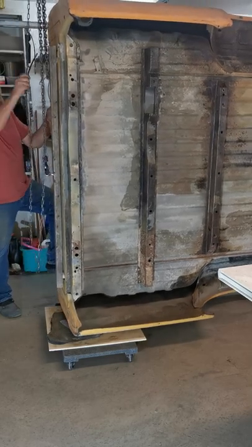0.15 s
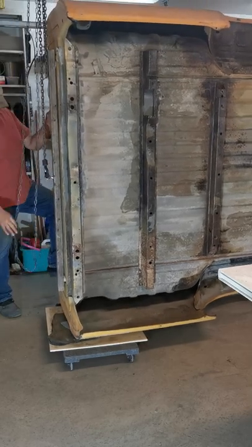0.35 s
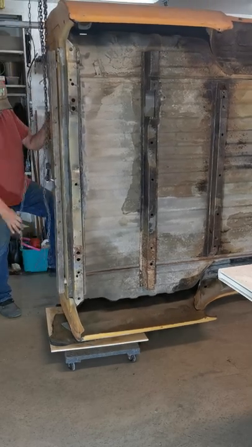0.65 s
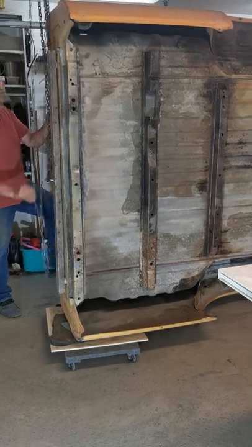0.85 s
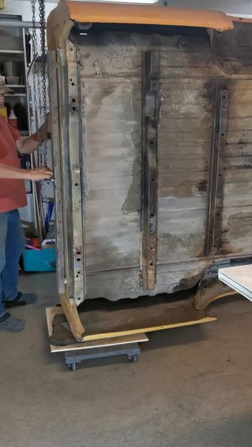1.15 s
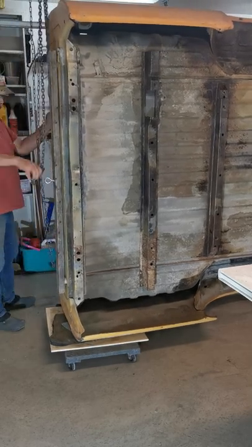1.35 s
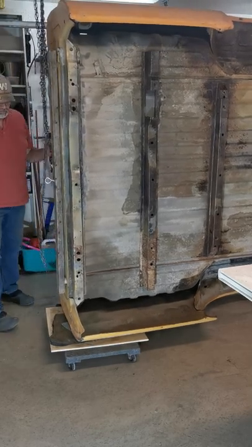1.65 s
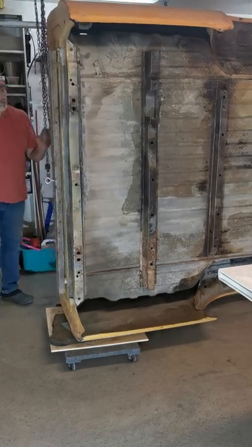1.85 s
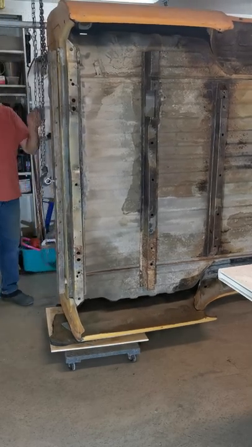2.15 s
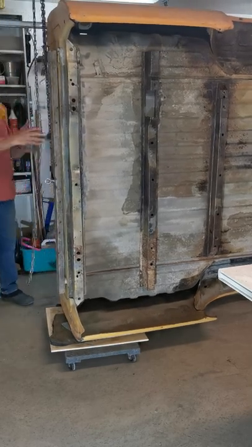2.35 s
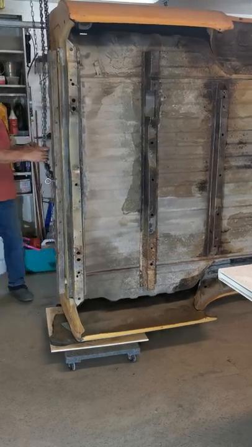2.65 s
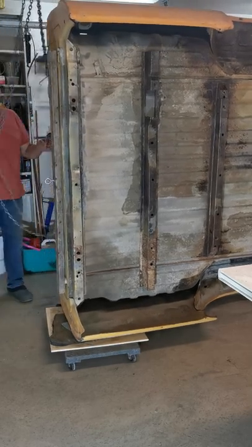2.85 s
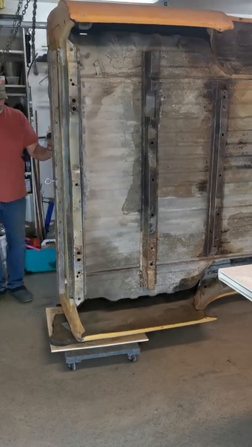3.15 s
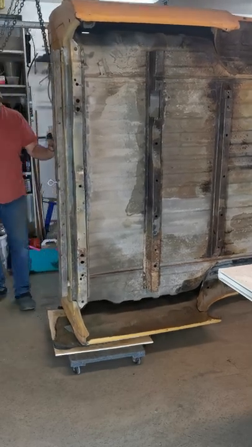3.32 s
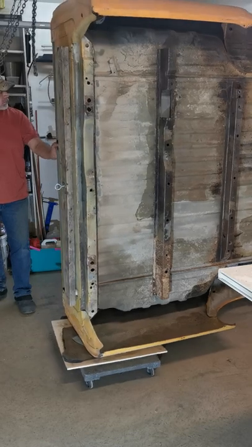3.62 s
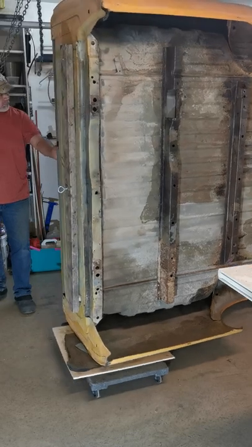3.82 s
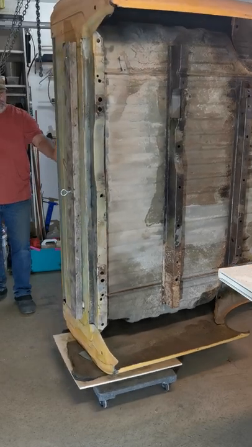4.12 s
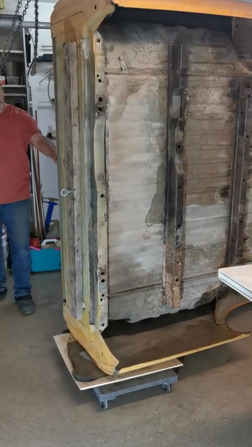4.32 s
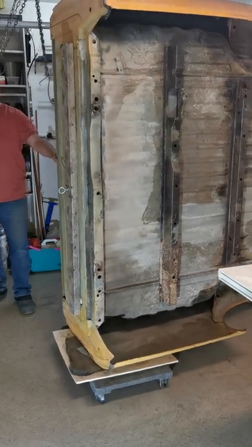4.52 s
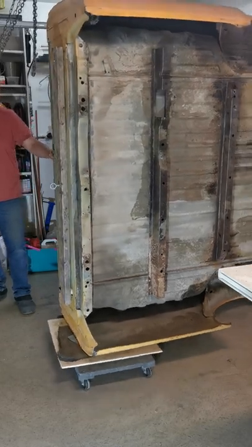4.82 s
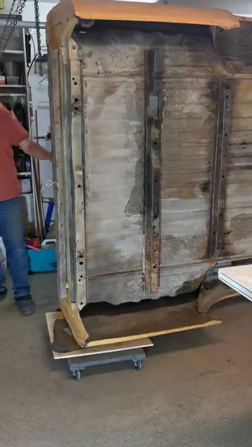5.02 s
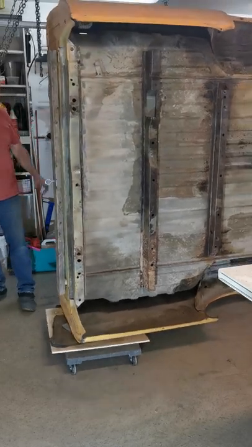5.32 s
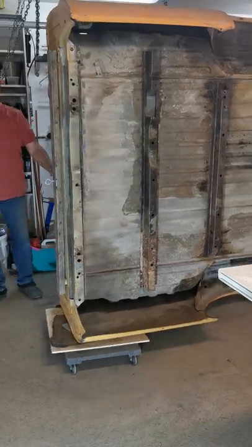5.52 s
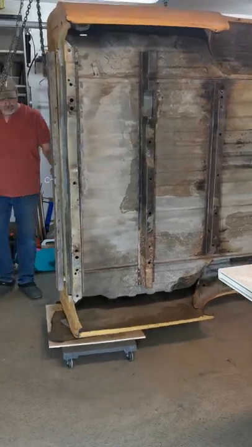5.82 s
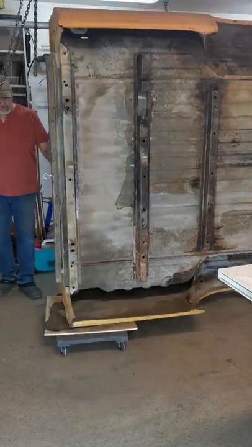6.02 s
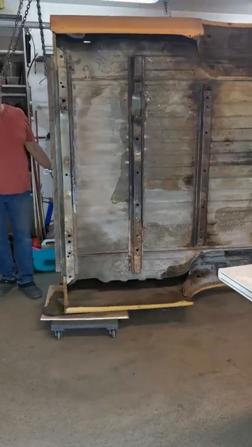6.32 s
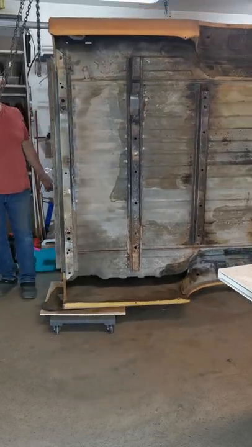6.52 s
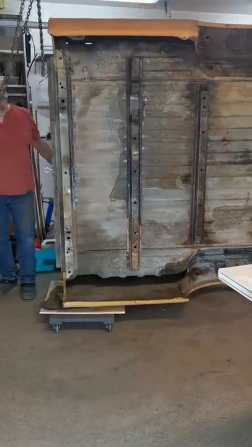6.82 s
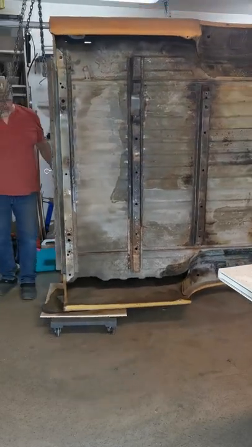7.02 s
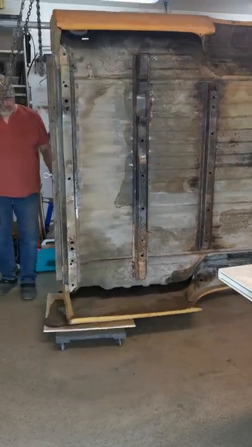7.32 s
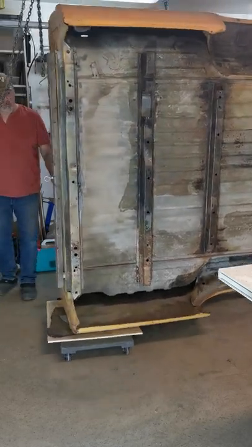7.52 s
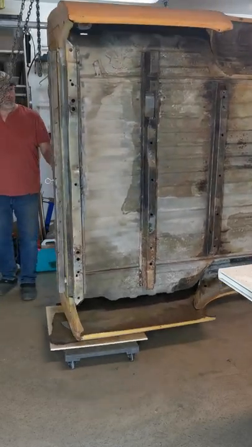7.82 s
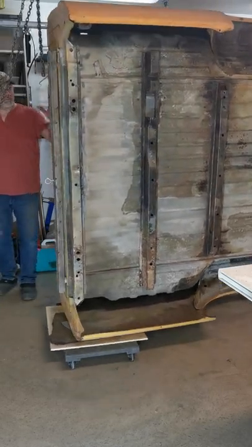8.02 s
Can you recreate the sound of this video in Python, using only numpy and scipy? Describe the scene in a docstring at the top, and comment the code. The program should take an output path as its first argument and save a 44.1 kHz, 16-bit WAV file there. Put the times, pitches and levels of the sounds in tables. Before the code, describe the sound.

Rapid, unnaturally fast chain clatter opens, with bright ticks and short housing rattles. It suddenly drops to normal speed: a hard metal strike makes a large steel panel ring, then chain links scrape and hooks knock with short room echoes. Hollow booming and rolling rumble come and go, quieter midway, swelling strongly at the end. Quiet garage room tone; chain close, slightly to the right.

```python
"""A hand chain runs through a hoist in a garage; the first 1.46 s sound sped up, faster and higher, and from then
on the pace is normal. The chain is noise gated by small contacts. Knocks of links and hooks come throughout: each
is a snap of noise that spreads into the echo of the room. Single rings are wavering tones, ticks tiny noise bursts.
From 1.46 s a large steel truck bed swings on a wheeled dolly: small jolts make its resonances boom and rumble.
Room noise lies under it all, joined by a faint hum from 1.46 s on."""
import sys
import numpy as np
from scipy import signal
from scipy.fft import rfft, irfft, next_fast_len
from scipy.io import wavfile
from scipy.ndimage import uniform_filter1d, map_coordinates

SR = 44100
rng = np.random.default_rng(int(sys.argv[2]) if len(sys.argv) > 2 else 0)


def to_wav(s):
    """Save 16-bit WAV."""
    ch = np.atleast_2d(s).T  # columns
    pcm = np.round(np.clip(ch, -1, 1) * 32767)  # PCM
    wavfile.write(sys.argv[1], SR, pcm.astype(np.int16))


N = 360341
NORMAL_S = 1.46  # until then all sounds sped up, faster and higher; from then on at normal pace, with the bed
STEP = 32  # samples between envelope values

# Rings of the chain links in the sped-up part. Each row: frequency in Hz, width in Hz, strength in dB.
LINK_RINGS = [(4780, 170, -2), (6030, 140, -26), (6500, 370, 1), (8200, 120, 3.5), (9230, 1100, 5.5),
              (10800, 380, 7), (12300, 160, -8), (12940, 400, 12), (15200, 280, 0.5)]


def amp(db):
    """Gain of a level in dB."""
    return 10 ** (np.asarray(db) / 20)


def unit(x):
    """Scale x to an rms of 1."""
    return x / np.sqrt(np.mean(x ** 2) + 1e-20)


def along(points, hz):
    """Read a curve of (Hz, value) points on a log frequency axis."""
    point_hz, value = np.transpose(points)
    return np.interp(np.log(hz + 1), np.log(point_hz + 1), value)


def curves(rows):
    """One value per sample for each column after the time."""
    s, *columns = np.transpose(rows)
    return [np.interp(np.arange(N) / SR, s, column) for column in columns]


def modes(table, f):
    """Response of a set of resonances, added with alternating signs."""
    total = 0
    for k, (hz, width_hz, db) in enumerate(table):
        damping = 1j * f * width_hz
        total = total + (-1) ** k * amp(db) * damping / (hz * hz - f * f + damping)
    return total


def filtered(x, response):
    """Multiply the spectrum of x by a complex response of frequency."""
    n = x.shape[-1]
    size = next_fast_len(n + 8192)
    return irfft(rfft(x, size) * response(np.fft.rfftfreq(size, 1 / SR)), size)[..., :n]


def contacts(n, rate, spread_db, life, steady):
    """Two unrelated noises gated by the same random contacts (rate per s, life in s), over a steady share."""
    hits = (rng.random(n) < rate / SR) * amp(spread_db * rng.standard_normal(n))
    gate = signal.lfilter([1], [1, -np.exp(-1 / (life * SR))], hits)
    return unit((steady + unit(gate)) * rng.standard_normal((2, n)))


def ringing(x, table, drift_db, rate):
    """x through each resonance, whose strength drifts on its own as other parts are struck."""
    n = x.shape[-1]
    size = next_fast_len(n + 8192)
    spectrum, f = rfft(x, size), np.fft.rfftfreq(size, 1 / SR)
    drifts = rng.uniform(-1, 1, (len(table), int(n * rate / SR) + 2))
    total = 0
    for knots, mode in zip(drifts, table):
        drift = np.interp(np.arange(n) * rate / SR, np.arange(len(knots)), knots)
        total = total + amp(drift_db * drift) * irfft(spectrum * modes([mode], f), size)[:, :n]
    return unit(total)


def clinks(n, table):
    """Single parts clink at random, each near one of the given rings and a little off pitch."""
    rate, t60, spread_db = 260, 0.03, 2  # per s, s to fall 60 dB, dB
    detune_share = 0.095  # of the pitch
    count, t = round(rate * n / SR), np.arange(SR // 16) / SR
    when, which, phase = rng.random((3, count, 1))
    detune, size = rng.standard_normal((2, count, 1))
    chosen = np.array(table)[(which * len(table)).astype(int)]
    hz, _, db = np.transpose(chosen, (2, 0, 1))
    arc = 2 * np.pi * hz * (1 + detune_share * detune) * t
    # strong and weak rings are brought closer together in level
    fade = amp(0.4 * db + spread_db * size - 60 * t / t60) * (1 - np.exp(-t / 0.0031))
    at = ((when * n).astype(int) + np.arange(len(t))).ravel()
    pair = []
    for p in (0, phase):  # same clinks in both channels, with unrelated phases
        tones = fade * np.sin(arc + 2 * np.pi * p)
        pair.append(np.bincount(at, tones.ravel(), n)[:n])
    return unit(np.array(pair))


def spread(pair):
    """Turn a pair of signals into left and right: the bass is alike on both, the treble mostly unrelated."""
    # Each row: frequency in Hz, level of the unshared part against the shared part in dB.
    side_db = [(30, -18), (70, -27), (140, -22), (280, -18.5), (600, -10.5), (1500, -5), (10000, -0.5)]

    def shares(f):
        turn = np.arctan(amp(along(side_db, f)))
        return np.array([np.cos(turn), np.sin(turn)])

    mid, side = filtered(pair, shares)
    return np.array([mid + side, mid - side])


def stroke(s, rise, held, db, fall, sag=0):
    """Power of one stroke: it swells, holds while it sags, then falls (fall and sag in dB per s)."""
    t = np.arange(0, N + STEP, STEP) / SR - s
    swell = np.sin(np.pi / 2 * np.clip(t / rise, 0, 1)) ** 2
    level_db = db - sag * np.maximum(t, 0) - fall * np.maximum(t - rise - held, 0)
    return (swell * amp(level_db)) ** 2


def gain(strokes):
    """Gain per sample of overlapping strokes, whose powers add."""
    power = sum(strokes)
    return np.interp(np.arange(N) / STEP, np.arange(len(power)), np.sqrt(power))


def room():
    """Steady coloured noise of the room; from 1.46 s on it is duller and a thin hum wavers in it."""
    # Colours of the room noise, early and late. Each row: frequency in Hz, level in dB.
    early_colour = [(15, -40), (25, -8), (60, -26), (177, -3.5), (600, -7), (854, -4), (1510, -0.5),
                    (2090, -10.5), (2330, -12), (5570, -19.5), (14400, -24), (16500, -46)]
    late_colour = [(15, -38.5), (25, -16), (208, -8), (296, -3), (349, -12), (410, -11), (524, -35),
                   (902, -26), (3410, -37), (14000, -42), (16500, -48)]
    noise = rng.standard_normal((3, 2, N))
    early = amp(-51.5) * unit(filtered(noise[0], lambda f: amp(along(early_colour, f))))
    late = amp(-54) * unit(filtered(noise[1], lambda f: amp(along(late_colour, f))))
    # noise through one narrow resonance: 850 Hz, 6 Hz wide
    hum = amp(-73) * unit(filtered(noise[2], lambda f: modes([(850, 6, 0)], f)))
    return np.where(np.arange(N) < NORMAL_S * SR, early, late + hum)


def chain():
    """Dense link contacts clatter and ring the links and, in the sped-up part, shake the hoist housing."""
    # Strokes of the sped-up chain. Each row: start in s, rise in s, time held in s, rattle in dB,
    # housing above the rattle in dB.
    quick_strokes = [(0.083, 0.013, 0.019, -32.5, -12), (.14, 0.018, 0.057, -43, -11),
                     (0.214, 0.009, 0.18, -35, -4.5), (0.498, 0.0039, 0.14, -46, -20),
                     (0.599, 0.016, 0.096, -36, -1.5), (0.679, 0.026, 0.022, -39.5, -1),
                     (.77, 0.024, 0.03, -50, 8), (.835, 0.033, 0.056, -39.5, 1),
                     (.97, 0.021, 0.029, -35.5, -6), (1.035, 0.029, 0.015, -33, -7.5),
                     (1.13, 0.015, 0.018, -30.5, -20), (1.25, 0.081, 0.031, -46.5, 13.5),
                     (1.41, 0.02, 0.018, -46, -11)]
    # Drags and sways at normal pace. Each row: start in s, rise in s, time held in s, rattle in dB.
    drags = [(1.69, 0.055, 0.2, -40), (1.891, 0.083, 0.046, -26.5), (2.5, 0.18, 0.14, -31.5),
             (2.95, 0.045, 0.16, -57.5), (3.27, 0.085, .05, -52.5), (3.67, 0.026, 0.45, -56),
             (4.52, 0.1, 0.12, -51.5), (5.398, 0.015, .05, -62), (5.76, 0.11, 0.03, -44.5),
             (6.2, 0.095, 0.31, -58.5), (6.749, 0.19, 0.19, -68.5), (6.98, 0.12, 0.33, -56),
             (7.6, 0.065, 0.035, -48), (8.02, 0.13, 0.12, -43)]
    # Rings of the housing and of the chain at normal pace. Each row: frequency in Hz, width in Hz, strength in dB.
    housing_rings = [(180.6, 26, -1), (356, 39, -4.5), (722, 47, 0), (1007, 91, -2.5), (1186, 26, -2.5),
                     (1420, 37, -5), (1798, 12, 2), (2650, 510, -15.5)]
    normal_rings = [(2100, 250, 3), (3420, 260, -16), (5890, 1000, 12.5), (4600, 340, -8.5),
                    (8100, 450, 11.5), (15300, 400, -9)]
    # Broad colours of the chain, sped up and at normal pace. Each row: frequency in Hz, level in dB.
    clatter = [(880, -25), (1500, -9), (2330, -5.5), (6430, -6), (7320, -10), (13100, -16), (15400, -18),
               (16500, -49.5)]
    hiss = [(710, -24.5), (1200, -7), (1310, -3), (1560, 1), (8270, -12), (11400, -23.5), (15600, -20.5),
            (16500, -34.5)]
    quick_fall, housing_fall, drag_fall = 580, 260, 180  # dB per s

    n = round(NORMAL_S * SR)
    rattle = gain(stroke(s, rise, held, db, quick_fall) for s, rise, held, db, _ in quick_strokes)[:n]
    shake = gain(stroke(s, rise, held, db + more_db, housing_fall)
                 for s, rise, held, db, more_db in quick_strokes)[:n]

    taps = contacts(n, 120, spread_db=2, life=0.005, steady=1.4)
    links = unit(filtered(taps, lambda f: amp(along(clatter, f))))
    links = unit(links + amp(-0.5) * ringing(taps, LINK_RINGS, drift_db=10, rate=19))
    links = links + amp(-6) * clinks(n, LINK_RINGS + housing_rings[3:] + normal_rings[:4])

    taps = contacts(n, 55, spread_db=6, life=0.0091, steady=1.8)
    housing = ringing(taps, housing_rings, drift_db=2, rate=25)
    housing = unit(housing + clinks(n, housing_rings[2:7]))
    housing = filtered(housing, lambda f: f ** 4 / (f ** 4 + 140 ** 4))  # too small to radiate deep bass
    quick = rattle * unit(links) + shake * housing

    taps = contacts(N - n, 110, spread_db=4, life=0.007, steady=1.3)
    normal = unit(filtered(taps, lambda f: amp(along(hiss, f))))
    normal = unit(normal + amp(-5.5) * ringing(taps, normal_rings, drift_db=10, rate=3.7))
    normal = normal + amp(-13.5) * clinks(N - n, normal_rings)
    drag = gain(stroke(*row, drag_fall) for row in drags)[n:]
    return np.hstack([quick, drag * unit(normal)])


def knocks():
    """Each knock is a snap that spreads into dense echoes; the higher the band, the sooner it dies."""
    # Knocks of links and hooks. Each row: time in s, level in dB, clang and bright part against the middle
    # part in dB, strongest ring in Hz, time scale of the decay in s.
    blows = [(0.088, -29, -15, -10, 2540, 0.63), (0.147, -28, -4.5, 1.5, 6350, 0.4),
             (0.395, -31, -1, 3.5, 6340, 0.21), (0.5393, -36, 3.5, 4, 7160, 0.37),
             (0.601, -35, 9.5, 8.5, 6000, 0.65), (0.839, -33, -6, 10.5, 6370, 0.58),
             (0.9089, -29, -24, 5, 6260, 0.38), (0.9743, -30, -17, 9, 8800, 0.2),
             (1.041, -32.5, -7, -7, 9100, 0.47), (1.1353, -39.5, 3.5, 1, 6010, 0.73),
             (1.256, -42.5, 13, 6, 2560, 0.36), (1.312, -24, 4, 1, 3660, 0.23),
             (1.37, -33, -17, 9, 5660, 0.15), (1.497, -55.5, -1, 12, 8340, 1),
             (1.6826, -17.5, 6.5, 3.5, 2970, 0.82), (1.8958, -18, -1, 6, 7540, 1),
             (2.47, -36.5, -9, 5, 8500, 1), (2.489, -25.5, 1.5, -1.5, 2340, 0.4),
             (2.528, -35.5, 14, 3, 8300, 0.53), (2.6228, -22.5, -0.5, -16, 3220, 0.56),
             (2.733, -21, 2, 2, 4070, 0.39), (2.823, -39, 14.5, 13.5, 7800, 0.53),
             (3.0911, -20.5, 4.5, 2.5, 5530, 0.18), (3.118, -24, 0.5, -2, 4600, 0.56),
             (3.3493, -26, -10, 1.5, 2520, 0.39), (3.4124, -18.5, 2.5, 1.5, 6400, 0.62),
             (3.711, -40, -1, -17, 2300, 0.19), (3.7446, -34.5, 14.5, 6, 6450, 0.58),
             (3.817, -33, -10, -3, 2240, 0.52), (3.946, -38.5, -11, -1, 4470, 0.42),
             (4.0509, -28.5, -3, -2, 2840, 0.37), (4.5036, -49, 4, -28, 2470, 0.87),
             (4.742, -36, -14, -6, 2870, 0.2), (4.646, -43, -10, -10, 2400, 0.3),
             (4.7784, -27.5, -4, 1.5, 3640, 0.67), (4.8382, -33, 3.5, -3, 2060, 0.45),
             (5.005, -47.5, -14, 2, 5520, 0.37), (5.069, -48.5, 9, 3, 2690, 1),
             (5.105, -25, -6, -21, 3720, 0.46), (5.214, -40, 2, 6.5, 6210, 0.44),
             (5.36, -60.5, 17, 3, 2500, 0.33), (5.455, -42.5, 0.5, -9, 3660, 0.5),
             (5.472, -40.5, -2.5, 11.5, 7400, 0.63), (5.844, -37, -13, 5.5, 2130, 0.77),
             (6.0545, -33, 5, 7, 5800, 0.51), (6.193, -30.5, 1, -1, 1960, 0.46),
             (6.2644, -39, 10.5, 6.5, 5300, 0.38), (6.355, -30, -6, 5.5, 6070, 0.49),
             (6.469, -41.5, -17, 4.5, 5560, 0.68), (7.031, -50, 0, -2, 3000, 0.76),
             (7.1851, -32.5, 2, 4.5, 4600, 0.56), (7.286, -31, -1, 3.5, 5700, 0.59),
             (7.4776, -37.5, -30, 1, 4100, 0.52), (7.6313, -36.5, 3.5, -2.5, 2090, 0.55),
             (7.888, -38.5, -3, -22, 3500, 0.54), (8.0246, -24.5, -2, 4, 5150, 0.61),
             (8.0479, -25.5, 15, 8.5, 6440, 1)]
    # Colour of the clang. Each row: frequency in Hz, level in dB.
    clang_colour = [(180, -48.5), (300, -29.5), (381, -3.5), (684, -6.5), (1240, -0.5), (2560, -11),
                    (4000, -29.5), (5200, -26), (8800, -120)]
    # Top part against the bright part. Each row: time in s, level in dB.
    top_levels = [(.09, 0), (.15, -4), (.55, 2), (.6, -17), (.84, 0), (1.14, 1), (1.26, -7), (1.5, -9),
                  (2.47, -10.5), (2.5, -20), (2.83, -32), (3.09, -13.5), (3.41, -14.5), (3.75, -16),
                  (4.06, -21), (4.78, -14.5), (5.2, -20), (5.47, -9), (6.36, -14), (7.3, -10.5), (7.5, -21),
                  (8, -10.5)]
    # Where the middle, bright and top parts begin, in Hz.
    edges_hz = (2200, 5100, 10000)
    ring_strength, held_share = 1.65, 0.055  # of the strongest ring; time held as a share of the decay time
    snap_db, snap_grows, usual_db = 8.5, 0.086, -33  # snap of a usual knock, dB per dB of a harder one, usual level

    out, t = np.zeros((2, N + SR)), np.arange(26000) / SR
    f = np.fft.rfftfreq(len(t), 1 / SR)
    middle, bright, top = [1 / (1 + (hz / (f + 1)) ** 24) for hz in edges_hz]
    for s, db, clang_db, bright_db, hz, decay_s in blows:
        top_db = bright_db + np.interp(s, *np.transpose(top_levels))
        noise = rfft(rng.standard_normal((2, len(t))))
        # many small rings, new at each blow
        small = amp(3.4 * unit(uniform_filter1d(rng.standard_normal(len(f)), size=24)))
        mix_db = rng.normal(0, 2.1, len(LINK_RINGS))
        links = []
        if s < NORMAL_S:
            links = [(c, w, level + d) for (c, w, level), d in zip(LINK_RINGS, mix_db)]
        strongest = 1 + abs(ring_strength * modes([(hz, 0.18 * hz, 0)], f))
        colour = small * strongest * (1 + 0.33 * abs(modes(links, f)))

        after = np.maximum(t / decay_s - held_share, 0)
        after = after + 2.85 * after ** 2  # the fall steepens as the echoes thin out
        # level in dB, spectrum, speed of the fall
        parts = [(clang_db, amp(along(clang_colour, f)), 45), (0, middle - bright, 58),
                 (bright_db, bright - top, 64), (top_db, top / (1 + (f / 12500) ** 3), 75)]
        echo = 0
        for level, shape, fall_db in parts:
            echo = echo + amp(level - fall_db * after) * unit(irfft(noise * colour * shape, len(t)))

        extra = amp(snap_db + snap_grows * (db - usual_db)) - 1
        snap = (1 - np.exp(-t / 0.00098)) * (1 + extra * np.exp(-t / 0.0011))
        out[:, round(s * SR) - 50:][:, :len(t)] += amp(db - 12.5) * snap * echo
    return out[:, :N]


def rings(rows):
    """Tones with wandering phase whose strength breaks up under new contacts, the more the wider the line."""
    chatter_db, chatter_s, full_width_hz = 3, 0.005, 40  # depth, pace, line width from which the depth is full
    out, size = np.zeros((2, N)), SR // 2
    for s, rise, held, db, fall, hz, width_hz in rows:
        start = round(s * SR)
        steps = rng.standard_normal((2, size))
        wander = np.cumsum(steps, axis=1) * np.sqrt(2 * np.pi * width_hz / SR)
        # the phase drifts over a few cycles, never jumps
        wander = uniform_filter1d(wander, size=round(3 * SR / hz))
        chatter = unit(uniform_filter1d(rng.standard_normal(size), size=round(chatter_s * SR)))
        breaks = amp(chatter_db * min(width_hz / full_width_hz, 1) * chatter)
        cycles = hz * np.arange(size) / SR + rng.random((2, 1))
        tone = breaks * np.sqrt(2) * np.sin(2 * np.pi * cycles + wander)
        envelope = gain([stroke(s, rise, held, db, fall)])[start:start + size]
        out[:, start:start + size] += envelope * tone[:, :N - start]
    return out


def ticks():
    """A link strikes its neighbour: a very short noise burst, its unshared part half as strong as the shared."""
    # Each row: time in s, level of the burst before its filter in dB.
    strikes = [(.2487, -23), (0.849, -27), (0.916, -26), (0.977, -21), (1.044, -17.5), (1.137, -26),
               (4.778, -26), (3.091, -32), (5.846, -28)]
    decay_s, low_hz, high_hz = 0.00061, 1500, 7000  # decay time, edges of the band
    out, t = np.zeros((2, N)), np.arange(SR // 50) / SR
    for s, db in strikes:
        burst = np.exp(-t / decay_s) * rng.standard_normal((2, len(t))) * [[1], [0.5]]
        out[:, round(s * SR):][:, :len(t)] += amp(db) * burst
    return filtered(out, lambda f: 1j * f / (low_hz + 1j * f) / (1 + 1j * f / high_hz))


def pushes():
    """Gains of rumble, deep modes, sheet, boom and heave: the sheet dies first, the low parts build slowly."""
    # The bed is pushed or jolted on the dolly. Each row: start in s, rise in s, time held in s, rumble in dB,
    # then against the rumble: deep modes, upper sheet, boom and heave in dB; last the rumble's fall in dB per s.
    jolts = [(1.469, 0.0065, 0.26, -57.5, 1, -2.5, -4, -11, 60.4),
             (1.683, 0.024, 0.17, -28, -12, 7.5, -15.5, -45, 129),
             (1.99, 0.062, 0.087, -29.5, -9, 0, -25, -24, 56.4),
             (2.48, 0.032, 0.16, -33.5, -22, -1.5, -25, -23, 59.7),
             (2.74, 0.031, 0.15, -36, -16.5, -4.5, -20.5, -28, 199),
             (3.0905, 0.003, 0.007, -40, -12, 8, -17, -18, 124),
             (3.332, 0.024, 0.017, -29.5, -5, -7.5, -18, -26, 150),
             (3.43, 0.035, 0.084, -29, -9.5, -8.5, -20.5, -20, 45.3),
             (3.74, 0.011, 0.21, -29, -6, -8, -20, -24.5, 84.5),
             (4.041, 0.014, 0.019, -28.5, -5, -20, -27, -32, 79),
             (4.529, 0.088, 0.27, -33.5, -11, -7, -8, -21, 60),
             (4.73, 0.024, 0.15, -30, -6.5, -9.5, -16, -21, 43.5),
             (5.07, 0.027, 0.062, -38, -20, -12, -32, -22, 80),
             (5.44, 0.042, 0.023, -48, -4, -26, -12, -18, 61),
             (5.832, 0.028, 0.17, -36.5, 1.5, -10, -14, -17, 64.6),
             (6.04, 0.019, 0.25, -30.5, -6.5, -14.5, -14.5, -29, 70),
             (6.35, 0.012, 0.1, -32.5, -10.5, -9.5, -18, -22, 54),
             (6.961, 0.16, 0.14, -34, -4.5, -7.5, -7.5, -24, 60),
             (7.16, 0.21, 0.025, -27.5, -2.5, -6.5, -25, -29, 51),
             (7.63, 0.017, 0.058, -34, -8, -12, -19, -16, 89),
             (8.019, 0.021, .2, -22, -4, -16, -7, -15, 50)]
    deep_slower, boom_slower, heave_slower = 1.36, 2.2, 1.5  # rise times against the rumble's
    sheet_fall, boom_fall, heave_fall = 1.18, 0.72, 0.41  # falls against the rumble's
    sheet_sag = 36  # dB per s lost by the sheet from the start
    parts = []
    for s, rise, held, db, deep_db, sheet_db, boom_db, heave_db, fall in jolts:
        parts.append([stroke(s, rise, held, db, fall),
                      stroke(s, deep_slower * rise, held, db + deep_db, fall),
                      stroke(s, rise, held, db + sheet_db, sheet_fall * fall, sheet_sag),
                      stroke(s, boom_slower * rise, held, db + boom_db, boom_fall * fall),
                      stroke(s, heave_slower * rise, held, db + heave_db, heave_fall * fall)])
    return np.array([gain(part) for part in zip(*parts)])


def bed():
    """Wheels and swaying shake the sheet steel in dense small jolts, which excite its resonances."""
    # Resonances of the bed, its thin upper sheet, its boom and the slow flexing of the whole bed.
    # Each row: frequency in Hz, width in Hz, strength in dB.
    bed_modes = [(209.4, 12, 0.5), (233.4, 18, -2.5), (290.8, 11.6, 5.5), (354.4, 26, -4), (417.4, 22, 4),
                 (462, 31, -5), (548, 45, -12), (638, 12, -8), (750, 39, -28)]
    sheet_modes = [(692, 116, 22), (918, 62, 19.5), (948, 55, 20), (1270, 105, 16), (1362, 130, 13),
                   (1810, 860, 8.5)]
    boom_modes = [(81, 21, -2.5), (97.4, 6.1, 3), (118.2, 2.2, 6), (140, 5.6, -0.5)]
    heave_modes = [(37.7, 6.1, -7.5), (65, 13, -8)]
    deep_hz = 260  # top of the deep modes

    def band(f, lo_hz, hi_hz):
        return 1 / (1 + (lo_hz / (f + 1)) ** 6) / (1 + (f / hi_hz) ** 6)

    n = round(NORMAL_S * SR)
    gains = pushes()[:, None, n:]
    jolts = contacts(N - n, 120, spread_db=4, life=0.006, steady=3)
    shaken = filtered(jolts, lambda f: band(f, 153, 780))
    body = ringing(shaken, [m for m in bed_modes if m[0] > deep_hz], drift_db=3.5, rate=4)
    dense = unit(filtered(shaken, lambda f: band(f, 220, 670)))  # many small modes close together
    body = unit(body + amp(-5.5) * dense)
    deep = ringing(shaken, [m for m in bed_modes if m[0] < deep_hz], drift_db=3, rate=4)
    sheet = unit(filtered(jolts, lambda f: band(f, 714, 2900) * modes(sheet_modes, f)))
    heave = unit(filtered(jolts, lambda f: band(f, 38, 110) * modes(heave_modes, f)))
    boom = unit(filtered(jolts, lambda f: band(f, 72, 240) * modes(boom_modes, f)))
    shake = np.sum(gains * [body, deep, sheet, boom, heave], axis=0)
    return np.pad(shake, ((0, 0), (n, 0)))


def scene():
    """The chain shifts a little in level and timing between left and right; bed and room sit in the middle."""
    # Single rings and one wide, faint band of treble hiss. Each row: start in s, rise in s, time held in s,
    # level in dB, fall in dB per s, frequency in Hz, line width in Hz.
    single_rings = [(.12, 0.073, .25, -57, 200, 178, 36), (.1, 0.008, 0.02, -38, 400, 1590, 100),
                    (0.097, 0.0083, 0.024, -41, 500, 2623, 33), (0.092, 0.0065, 0.013, -39, 500, 9300, 97),
                    (0.146, 0.0019, 0.007, -30, 400, 13400, 150),
                    (.155, 0.0083, 0.03, -37.5, 300, 1764, 19), (.23, 0.013, 0.055, -46, 400, 1182, 35),
                    (.235, .01, .1, -46.5, 300, 4590, 320), (.235, 0.011, 0.095, -41.5, 400, 6400, 160),
                    (0.714, .004, 0.019, -42, 500, 1400, 50), (.385, .01, .02, -41, 500, 6400, 54),
                    (.608, 0.0023, 0.023, -38.5, 402, 757, 37), (0.606, 0.0032, .02, -41, 400, 1945, 86),
                    (.61, 0.006, 0.072, -35.5, 502, 6410, 110), (.848, 0.0033, .015, -39.5, 500, 612, 38),
                    (.84, 0.015, 0.083, -35.5, 350, 6450, 42),
                    (1.04, 0.0032, 0.0087, -33.5, 402, 9300, 120),
                    (1.051, 0.022, 0.023, -40, 351, 1585, 170),
                    (1.141, 0.0087, 0.032, -44.5, 400, 2600, 130),
                    (1.265, 0.013, 0.033, -41.5, 400, 2575, 50), (1.365, .008, 0.015, -43, 498, 5830, 88),
                    (1.7, .02, 0.047, -34, 205.5, 1220, 26), (1.73, 0.024, 0.072, -30, 202, 991, 35),
                    (1.74, 0.061, 0.089, -27.5, 200, 418, 6.2),
                    (1.761, 0.034, 0.1, -28.5, 198.5, 289.5, 5.5), (2.0, 0.044, .2, -42, 57, 119.5, 2.7),
                    (2.04, 0.032, 0.15, -34, 56, 286.8, 5.8), (2.51, .02, 0.079, -40.5, 300, 8170, 270),
                    (2.52, 0.087, .28, -52, 200, 14900, 900), (2.618, 0.0046, 0.017, -37, 300.5, 3600, 110),
                    (2.618, 0.0055, 0.017, -44, 400.5, 5500, 65), (2.685, .01, 0.026, -32.5, 298, 2300, 15),
                    (2.705, .004, 0.023, -42, 351, 4850, 86), (2.824, 0.0064, 0.034, -36, 209, 8270, 150),
                    (3.0902, 0.001, .004, -23, 550, 1330, 15), (3.093, 0.002, .012, -29, 500, 860, 15),
                    (3.116, .002, .004, -37, 499, 984, 60), (3.093, 0.0036, 0.026, -37, 207, 4030, 58),
                    (4.632, 0.03, 0.046, -33.5, 200, 234, 3.6), (4.736, .02, 0.025, -38, 250, 424, 9),
                    (4.95, 0.019, 0.18, -39, 108, 444, 6.5), (5.855, 0.012, 0.067, -33.5, 150, 445, 14),
                    (6.071, 0.012, 0.015, -30, 303, 206.5, 8), (6.231, 0.014, 0.018, -32.5, 250, 254, 14),
                    (7.645, 0.01, 0.038, -27, 400, 439, 2), (7.73, 0.018, 0.032, -37.5, 250, 420, 14),
                    (6.049, 0.0069, 0.01, -38, 250, 6010, 400), (8.031, 0.022, .1, -31, 46, 113.5, 15),
                    (8.0202, 0.002, 0.032, -21, 358, 168, 34), (8.03, 0.037, .1, -30, 50, 401, 52)]
    # Balance of the chain. Each row: time in s, left above right in dB.
    balance = [(0, 0.5), (1.4, -0.5), (1.5, -4), (3.8, -1), (4.1, -1), (6.5, -1.5), (8.2, -1)]
    # Timing of the chain. Each row: time in s, how far left lags behind right in s.
    delays = [(1.4, 0), (1.5, -.0002), (3.8, -.0002), (4.1, .00005)]
    bed_top_hz = 600  # lower rings belong to the bed
    chain_rings = [r for r in single_rings if r[5] > bed_top_hz]
    bed_rings = [r for r in single_rings if r[5] < bed_top_hz]

    left, right = spread(chain() + knocks() + ticks() + rings(chain_rings))
    pan_db, lag = curves(balance) + curves(delays)
    left = map_coordinates(left, [np.arange(N) - lag * SR], order=2, mode="nearest", prefilter=True)
    placed = np.array([left * amp(pan_db / 2), right * amp(-pan_db / 2)])
    return placed + spread(bed() + room() + rings(bed_rings))


def record(dry):
    """The microphone drops by 30 dB around 15850 Hz, and nothing is kept above the band limit."""
    top_hz = 16650
    return filtered(dry, lambda hz: (hz < top_hz) * amp(-30 / (1 + np.exp((15850 - hz) / 50))))


dry = scene()
out = record(dry)
to_wav(out)
```